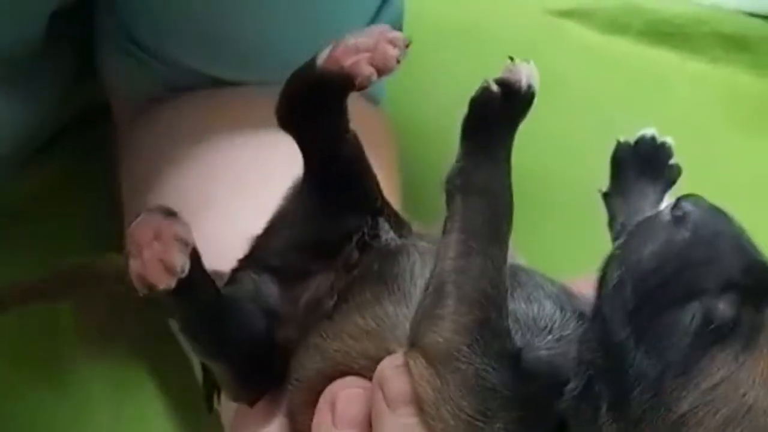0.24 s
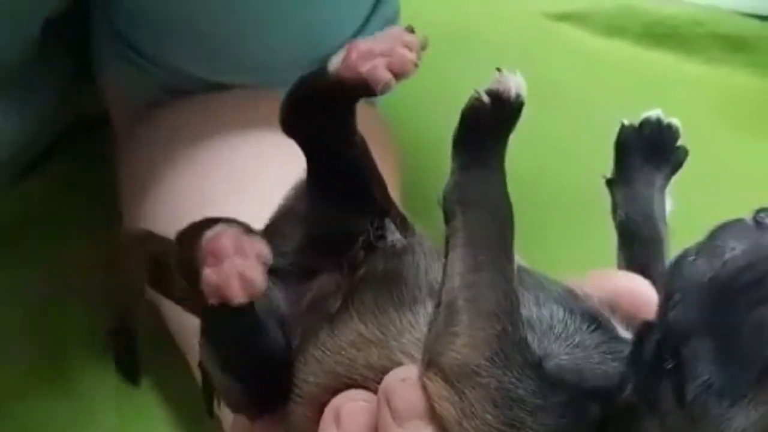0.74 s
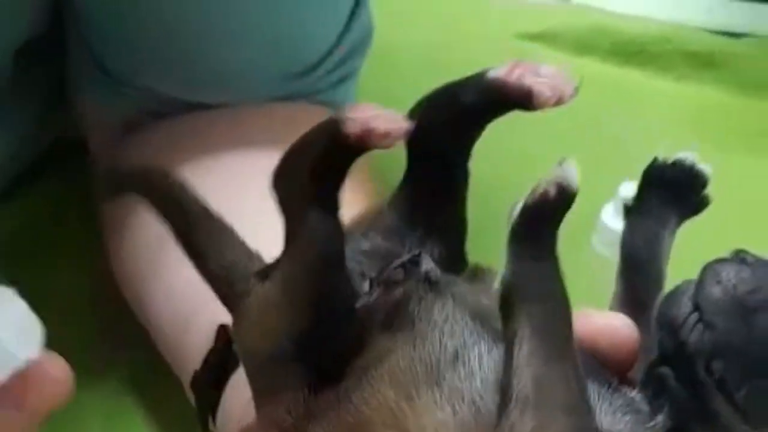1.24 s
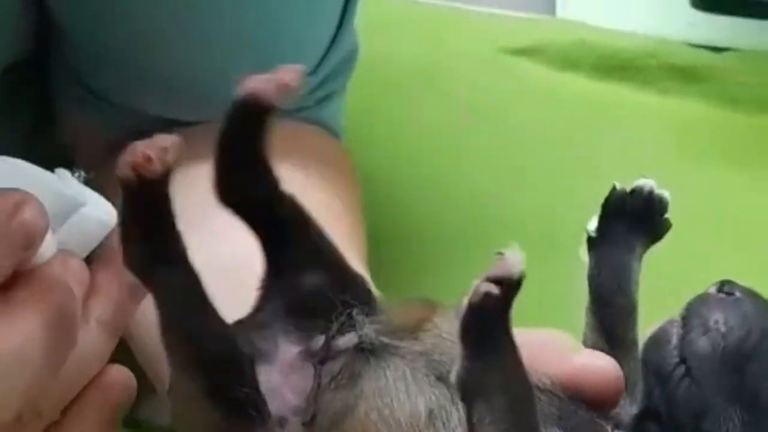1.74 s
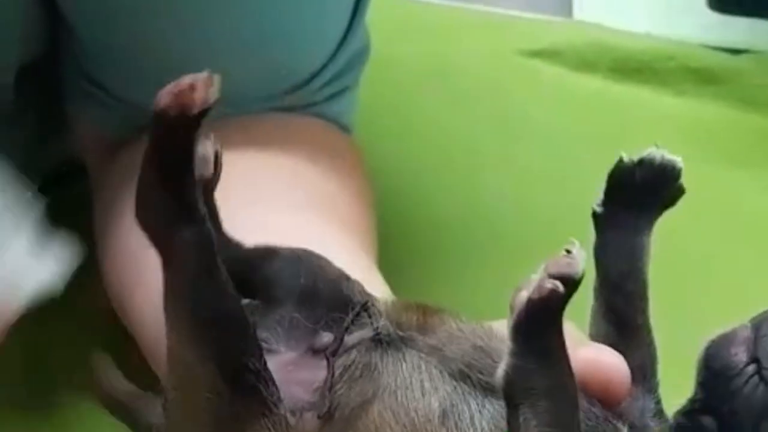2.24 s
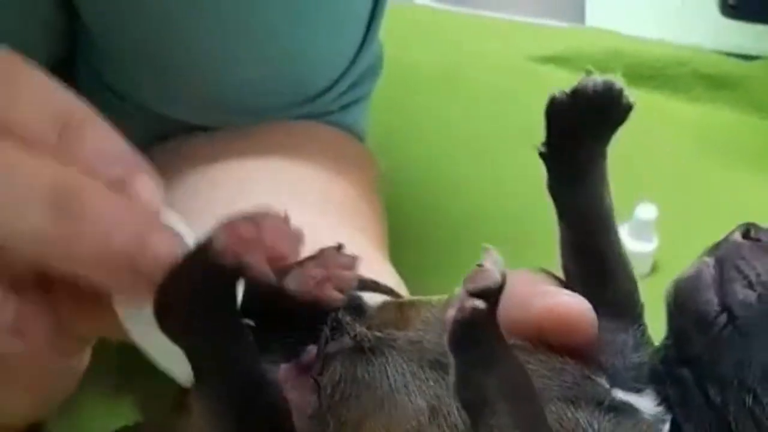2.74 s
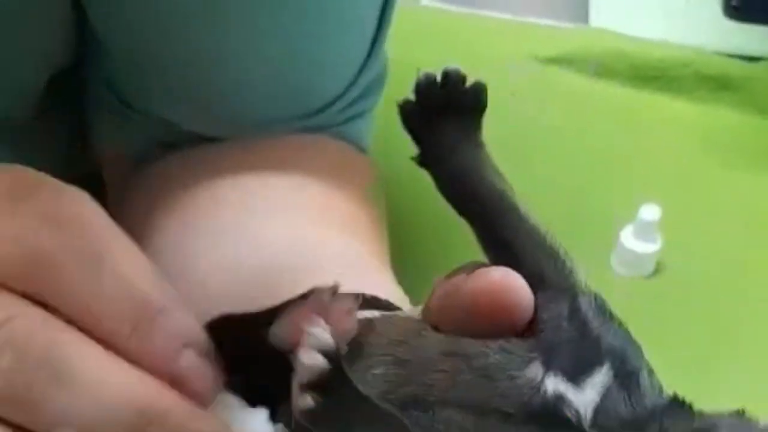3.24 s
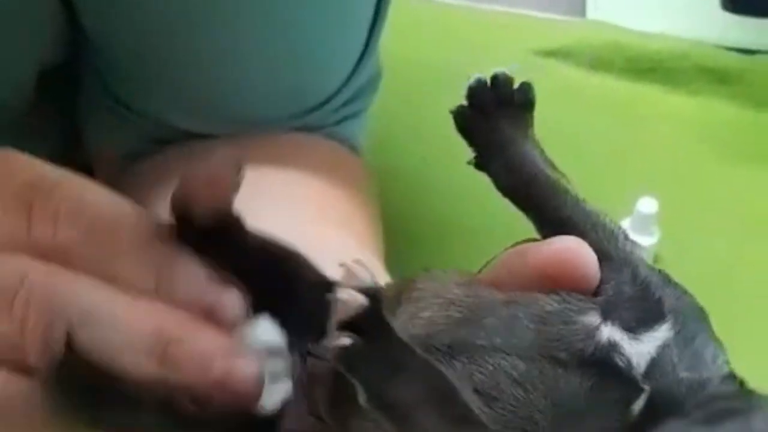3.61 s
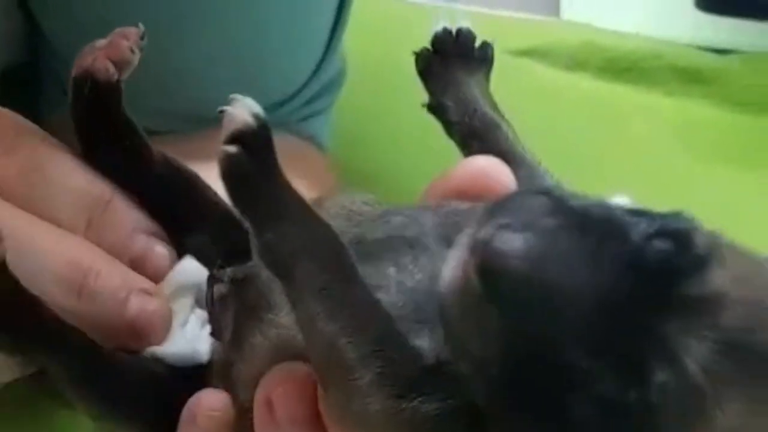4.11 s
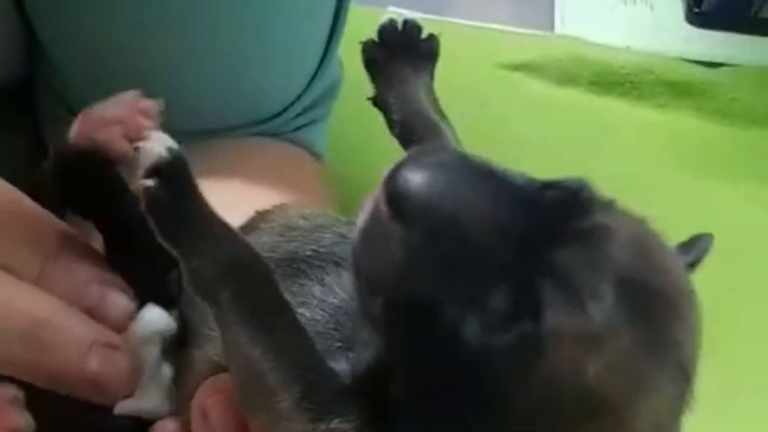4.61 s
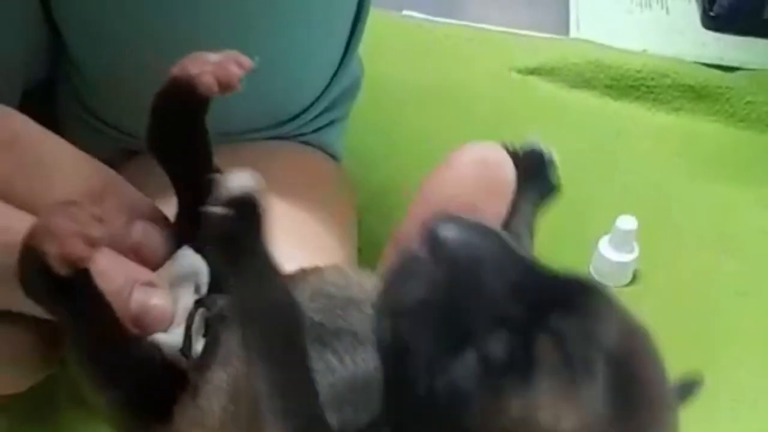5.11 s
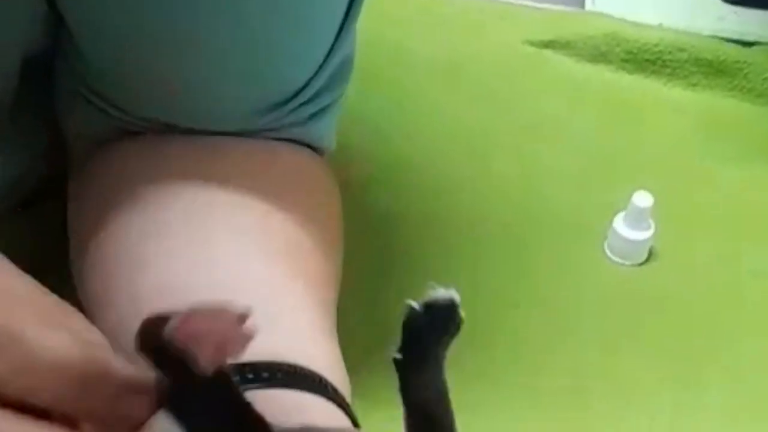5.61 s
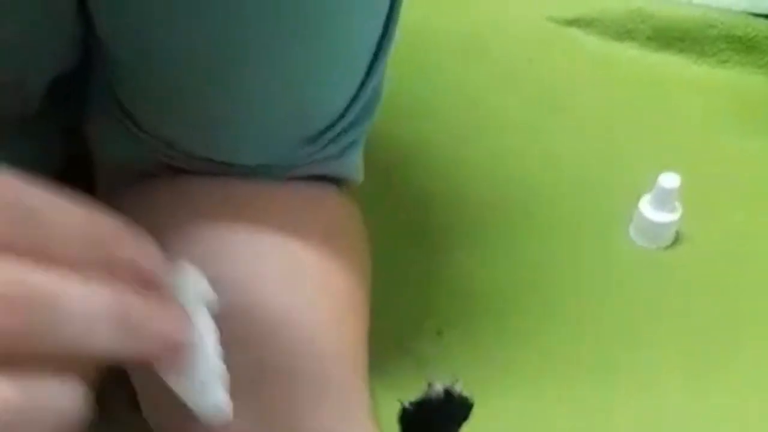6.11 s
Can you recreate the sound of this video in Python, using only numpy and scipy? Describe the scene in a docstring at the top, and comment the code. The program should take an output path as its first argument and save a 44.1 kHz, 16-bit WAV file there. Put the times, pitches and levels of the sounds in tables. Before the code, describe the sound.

Very close in a small furnished room, soft fingers brush fur over a low appliance hum. A newborn puppy lets out one short thin squeal and a faint gasp. A rough rasp then clears into a long, wavering, much louder squeal that snaps off in a yip. After a brief gap comes a lower, open wail fading in hiss, then a faint gasp and a few dull touches.

```python
"""Source-filter synthesis of a newborn puppy crying close to a phone in a small furnished room.
Soft touches on fur come first; then pulses of one larynx ring the throat as a short squeal and a gasp.
A rasp clears into a long squeal ending in a yip; a lower wail trails off in hiss, then a gasp and touches.
Two microphone ports hear it by delay, echo and diffuse decay; an appliance's tones and filtered noise
hum throughout, and the phone turns the bass down when little sounds above it."""
import sys
import numpy as np
from scipy import signal
from scipy.fft import rfft, irfft
from scipy.io import wavfile
from scipy.ndimage import uniform_filter1d

SR = 44100
rng = np.random.default_rng(int(sys.argv[2]) if len(sys.argv) > 2 else 0)


def generate_wav(sig):
    """Save sig (samples, or channels by samples) to the path in sys.argv[1] as 16-bit PCM at SR."""
    pcm = np.round(np.clip(np.atleast_2d(sig).T, -1, 1) * 32767).astype(np.int16)
    wavfile.write(sys.argv[1], SR, pcm)


N = 280476
TIME = np.arange(N) / SR  # s
FREQ = np.maximum(np.arange(N // 2 + 1) * SR / N, 1)  # Hz

# Centre pitch of each cry before jitter: (time [s], pitch [Hz])
SQUEAL_PITCH = [(1.13, 1002), (1.16, 1135), (1.17, 1010), (1.212, 1169), (1.33, 1141), (1.376, 1076),
                (1.398, 840), (1.42, 750)]
RASP_PITCH = [(1.85, 977), (1.878, 1237), (1.884, 818), (1.92, 1018), (1.928, 1147), (2.0, 1277),
              (2.14, 1296), (2.165, 1230)]
LONG_PITCH = [(2.17, 1244), (2.296, 1257), (2.35, 1330), (2.385, 1333), (2.66, 1307), (2.69, 1177),
              (2.75, 1140), (2.764, 1081), (2.888, 1100), (3.0, 1313), (3.08, 1410), (3.236, 1241),
              (3.28, 1322), (3.312, 1294)]
YIP_PITCH = [(3.316, 927), (3.326, 1018), (3.338, 1173), (3.36, 1113)]
WAIL_PITCH = [(3.81, 369.5), (3.822, 377.6), (3.976, 418), (4.088, 568.4), (4.22, 552), (4.29, 586.2),
              (4.374, 441), (4.44, 445.5), (4.458, 481), (4.65, 553.3), (4.68, 390.4), (4.72, 396.4)]
# Effort of each cry, to which each band adds its own offset: (time [s], level [dB])
SQUEAL_EFFORT = [(1.13, -62), (1.15, -57.5), (1.23, -47), (1.35, -49), (1.402, -48.5), (1.425, -67)]
RASP_EFFORT = [(1.853, -65), (1.88, -49.5), (1.96, -52.5), (2.01, -56.5), (2.12, -53), (2.164, -47)]
LONG_EFFORT = [(2.166, -42.0), (2.29, -45.5), (2.4, -54), (2.65, -49.5), (2.7, -43), (2.77, -43.5),
               (2.8, -36.5), (2.93, -34), (3.02, -39), (3.2, -35.5), (3.315, -42.5)]
YIP_EFFORT = [(3.319, -39.5), (3.325, -35), (3.337, -34.5), (3.353, -55.5)]
WAIL_EFFORT = [(3.814, -67), (3.825, -54), (3.99, -46.5), (4.1, -40), (4.31, -41.5), (4.4, -49.5),
               (4.52, -49), (4.6, -40), (4.68, -40), (4.73, -66), (4.8, -79)]
# Throat and mouth resonance, tight for the long squeal, open for the wail: (frequency [Hz], gain [dB])
SQUEAL_THROAT = [(500, -17), (850, 2), (1150, -2), (1700, -4.5), (2300, -6.5), (2800, -1), (3450, -11.5),
                 (4100, -25.5), (5200, -36), (8000, -24), (8700, -34), (10100, -15), (12200, -29),
                 (14600, -20)]
RASP_THROAT = [(450, -9.5), (900, -1.5), (1250, -1), (1600, 0), (2600, 6), (3600, 6.5), (4500, 6.5),
               (5200, -27.5), (7300, -11.5), (8300, -19), (9600, -21), (12900, -8), (14400, -13),
               (15500, -35)]
TIGHT_THROAT = [(500, -9), (900, 2), (1250, 2), (1800, -2.5), (2550, -6.5), (3100, -19.5), (4100, -20),
                (5400, -40.5), (6700, -23.5), (8700, -35), (10400, -15.5), (12000, -22), (14200, -11.5),
                (15600, -17)]
OPEN_THROAT = [(330, -13), (600, -3), (820, 1.5), (1130, -0.5), (1400, -2.5), (1680, -8), (2150, -12.5),
               (2850, -13.5), (3500, -7), (3900, -11), (4300, -16.5), (5200, -21), (7000, -14), (8400, -37),
               (10200, -7), (12300, -35), (14700, -20.5)]
# Raggedness of the vocal folds, added to their settled state:
# (start [s], end [s], ramp [s], roughness [0-1], strong-weak alternation [0-1])
RATTLES = [(1.1, 1.2, .015, .11, .55), (1.375, 1.45, .03, .27, .55), (1.84, 1.925, .02, .11, .65),
           (1.925, 1.98, .02, .27, .6), (1.98, 2.105, .02, .74, .45), (2.105, 2.168, .015, .22, .7),
           (2.392, 2.665, .02, .7, .2), (2.665, 2.78, .02, .08, 0), (2.735, 2.783, .015, .05, .6),
           (3.75, 4.0, .14, .1, .25), (4.42, 4.52, .05, .07, .15), (4.657, 4.82, .02, .33, .1)]
# Throat squeezes: (peak [s], rise [s], fall [s], change of mouth ring and edge [dB], peak hiss level [dB])
SQUEEZES = [(1.19, 0.048, 0.0053, 5.5, -51), (2.07, 0.11, 0.096, 14, -71), (2.762, 0.014, .018, -0.5, -60),
            (2.97, .06, 0.032, 3.5, -57.5), (3.2, 0.08, .12, 4, -55), (4.6, .04, 0.064, -1.5, -34.5),
            (4.69, 0.023, 0.078, -6.5, -48)]
# Spectrum of the squeezed airflow: (frequency [Hz], relative level [dB])
SQUEEZE_HISS = [(4000, -37), (7000, -8), (8500, -24.5), (10200, 8.5), (12000, -9), (14500, 6)]
# Breaths drawn after a cry: (start [s], end [s], mean level [dB])
GASPS = [(1.416, 1.79, -76), (4.774, 5.14, -80.5)]
# Spectrum of the drawn breath in the airway: (frequency [Hz], relative level [dB])
AIRWAY = [(400, -18), (750, -7.5), (1120, -5), (1900, -14.5), (3000, -2.5), (4500, -21.5), (8000, -29.5)]
# Colour of the voice at the ports: (frequency [Hz], left minus right [dB])
PORT_TILT = [(550, 4.5), (900, -0.5), (1150, -8), (1260, -4), (1400, 4), (1550, -0.5), (2100, -4),
             (2500, -7.5), (3400, -6), (7000, 0.5), (11500, 10), (14500, -1.5)]
# Reflections from near surfaces (lap, bed, wall) at each port: (delay [ms], share of direct sound [ratio])
LEFT_ECHOES = [(1.9, .12), (5.3, 0.05)]
RIGHT_ECHOES = [(2.401, 0.12), (6.1, 0.09)]
# Quick scatter of the voice by the puppy's body and the lap: (frequency [Hz], gain [dB])
SCATTER = [(500, -17.5), (1200, -10), (2200, -7.5), (5000, 1.5), (12000, -3.5)]
# Strength of the room's diffuse answer: (frequency [Hz], gain [dB])
ROOM_SEND = [(500, -17), (1200, -22), (2500, -26), (4000, -21), (7000, -16), (12000, -13)]
# Soft handling of fur and cloth:
# (start [s], peak brush level [dB], thud relative to brush [dB], swell time [s])
TOUCHES = [(.17, -83, -8, 0.042), (.555, -101, 38.5, 0.063), (5.416, -77, 0, 0.0012),
           (6.023, -77, 23.5, 0.036), (6.276, -76, -3, 0.037)]
# Tones of the appliance, before the common raise: (frequency [Hz], level [dB])
HUM = [(100.5, -67.5), (139, -69), (194.2, -61)]
# Balance of hum and rumble between the ports: (frequency [Hz], left minus right [dB])
HUM_TILT = [(60, -5), (110, -3), (200, -6.5), (380, -8.5), (700, -3), (1290, -3), (2380, -11), (4400, -13),
            (8120, 7), (15000, -9)]
# Spectrum of the appliance's rumble: (frequency [Hz], relative level [dB])
RUMBLE = [(15, -38.5), (25, -24.5), (48, -12.5), (69, -20), (91, -5.5), (139, -5), (167, -6.5), (197, -2.5),
          (223, -13.5), (295, -15), (384, -26), (412, -30.5), (700, -44), (910, -67.5), (1540, -120)]
# Spectrum of the microphone hiss: (frequency [Hz], relative level [dB])
MIC_HISS = [(350, -33), (600, 0), (625, -3), (984, -6.5), (2180, -16.5), (4980, -17), (7730, -22.5),
            (9760, -12.5), (10700, -15), (14300, -15.5), (16000, -14)]

CLEAR, HUSKY = .026, .045  # roughness of the settled folds, 0-1
ONSET_ROUGH, SETTLE_S = .25, .022  # extra roughness at a cry's start, and its decay time
RING_FOLLOW, EDGE_FOLLOW = 0.92, 0.96  # dB gained by mouth ring and thin edge per dB of effort
EDGE_DB_PER_OCTAVE = 8.5  # rise of the edge with pitch
FLUTTER_DB, UPPER_FLUTTER_DB = 1.3, -0.8
ROOM_T60_S, SCATTER_T60_S = .33, 0.039
HUM_WAVER_DB = 2.3
SUPPRESS_DB, OPEN_DB, KNEE_DB, SUPPRESS_S = 5, -47, 4, 0.083  # bass cut, threshold, softness, window
TOP_HZ = 15850


def larynx(hz, rough, alternation, start, end):
    """Quasi-periodic excitation: one click per fold closure, perturbed in time and size by roughness."""
    jitter = (.001 + .05 * rough) * walk(260)
    drift = .0025 * walk(45)
    rough_drift = .05 * np.minimum(rough, .25) * (walk(90) + walk(30))
    hz = hz * (1 + jitter + drift + rough_drift)
    cycles = np.cumsum(hz * (TIME > start) * (TIME < end)) / SR
    turn = np.arange(1, int(cycles[-1]))
    at = np.interp(turn, cycles, np.arange(N))  # closures, in samples
    i = at.astype(int)
    swing = 1 - 2 * (turn % 2)  # alternates +1 and -1
    time_chance, size_chance = rng.standard_normal((N // 100, 2))[:len(turn)].T
    shift = .19 * rough[i] ** 1.25 * time_chance + .07 * alternation[i] * swing  # periods
    at = at + SR / hz[i] * shift
    size = np.exp(.55 * rough[i] * size_chance) * (1 + .6 * alternation[i] * swing)
    # windowed sinc clicks place each closure between samples
    taps = at.astype(int)[:, None] + np.arange(-8, 9)
    offset = taps - at[:, None]
    clicks = size[:, None] * np.sinc(offset) * np.sinc(offset / 9)
    return np.bincount(taps.ravel(), clicks.ravel(), N), cycles


def folds(start, calm):
    """Irregular vibration: the folds start raggedly, settle, and break into rattles."""
    rough = calm + ONSET_ROUGH * np.exp(-np.abs(TIME - start) / SETTLE_S)
    alternation = 0
    for on, off, ramp_s, roughness, uneven in RATTLES:
        rattle = span(on, off, ramp_s)
        rough = rough + roughness * rattle
        alternation = alternation + uneven * rattle
    return rough, alternation


def cry(pitch, effort, throat, calm, low_db, ring_db, edge_db, brighten_db, pan_db, air):
    """Source-filter principle: pulses and air puffs ring the throat; effort sets the balance of bands."""
    hz, = curves(pitch)
    db, = curves(effort)
    start, end = effort[0][0], effort[-1][0]
    gate = span(start, end, .004)
    rough, alternation = folds(start, calm)
    pulses, cycles = larynx(hz, rough, alternation, start - .02, end + .02)
    puffs = band(rng.standard_normal(N), 12000, 17600) * np.cos(np.pi * cycles) ** 2
    voice = colour(pulses + air * puffs * gate, throat)

    usual_db, usual_hz = np.average(db, weights=gate), np.average(hz, weights=gate)
    push = db - usual_db
    progress = np.clip((TIME - start) / (end - start), 0, 1) - .5
    squeeze = sum(shrill_db * hump(s, rise, fall) for s, rise, fall, shrill_db, _ in SQUEEZES)
    ring = ring_db + RING_FOLLOW * push + squeeze
    edge = edge_db + EDGE_FOLLOW * push + squeeze
    edge = edge + EDGE_DB_PER_OCTAVE * np.log2(hz / usual_hz)
    edge = edge + brighten_db * progress  # drift over the whole cry

    # the level of the cry flutters, a little more in its upper partials
    flutter, upper_flutter = FLUTTER_DB * walk(55), UPPER_FLUTTER_DB * walk(35)
    body = steady(band(voice, 170, 2200, order=12)) * undb(low_db + push)
    mouth = steady(band(voice, 1745, 4030, order=12)) * undb(ring + upper_flutter)
    thin = steady(band(voice, 5000, 17000, order=16)) * undb(edge + upper_flutter)
    upper = (mouth + thin) * sides(pan_db)[:, None]
    return (body + upper) * gate * undb(usual_db + flutter)


def throat_hiss():
    """Turbulence noise: air is forced through the squeezed throat."""
    flow = sum(undb(db) * hump(s, rise, fall) for s, rise, fall, _, db in SQUEEZES)
    return flow * level(colour(rng.standard_normal(N), SQUEEZE_HISS), 0)


def gasps(ramp_s=0.051):
    """Turbulence noise filtered by the airway: the puppy's faint intake of air."""
    flow = sum(undb(db) * span(start, end, ramp_s) for start, end, db in GASPS)
    return flow * level(colour(rng.standard_normal(N), AIRWAY), 0) * undb(0.5 * walk(23))


def ports(voice, lag_ms):
    """Arrival-time difference and comb filtering: the left port hears first; echoes ripple both."""
    left = 1 + sum(share * delay(ms) for ms, share in LEFT_ECHOES)
    right = 1 + sum(share * delay(ms) for ms, share in RIGHT_ECHOES)
    tilt = np.sqrt(gains(PORT_TILT))  # half the difference on each side
    return irfft(rfft(voice) * np.array([left * tilt, right * delay(lag_ms) / tilt]), N)


def room(voice, build_s=0.028):
    """Diffuse-field decay: quick scatter from close by, then the room's short tail."""
    scatter = gains(SCATTER) * tail(SCATTER_T60_S, build_s / 10)
    reverberation = gains(ROOM_SEND) * tail(ROOM_T60_S, build_s)
    return irfft(rfft(voice.mean(axis=0)) * (scatter + reverberation), N)


def tail(t60_s, build_s):
    """Exponential decay of dense reflections: a spectrum of unit energy, independent at each port."""
    echoes = rng.standard_normal((2, N)) * undb(-60 * TIME / t60_s) * (1 - np.exp(-TIME / build_s))
    return rfft(echoes / np.sqrt(np.sum(echoes ** 2, axis=1, keepdims=True)))


def handling():
    """Friction noise and low impact noise: fingers and cloth brush the fur, with dull thuds."""
    brush = level(band(rng.standard_normal((2, N)), 590, 8000, order=2), 0) * undb(1.1 * walk(60))
    thud = level(band(rng.standard_normal(N), 110, 160, order=3), 0)
    out = 0
    for s, db, thud_db, swell_s in TOUCHES:
        age = np.maximum(TIME - s, 0)
        swell = age / swell_s * np.exp(1 - age / swell_s)  # peaks at 1
        out = out + undb(db) * swell * (brush + undb(thud_db) * thud)
    return out


def appliance(hum_db=4, rumble_db=-55.5, apart=0.42, swell_db=2.0):
    """Tonal hum and partly correlated noise: wavering lines and rumble, mostly louder on the right."""
    hum = 0
    for hz, db in HUM:
        strength = np.sqrt(2) * undb(db + hum_db + HUM_WAVER_DB * walk(8))
        hum = hum + strength * np.sin(2 * np.pi * hz * TIME + 0.163 * walk(4))
    noise = rng.standard_normal(N) + apart * rng.standard_normal((2, N))  # shared plus separate
    rumble = level(colour(noise, RUMBLE), rumble_db)
    low = irfft(rfft(hum + rumble) * sides(gains_db(HUM_TILT)), N)
    return low * undb(swell_db * walk(4.9))


def microphone_hiss():
    """Stationary self-noise: smooth coloured hiss, independent at each port."""
    return level(colour(rng.standard_normal((2, N)), MIC_HISS), -78)


def undb(db):
    """Logarithmic level: decibels to amplitude gain."""
    return 10 ** (np.asarray(db) / 20)


def level(x, db):
    """Root-mean-square measure: scale the signal to an rms level."""
    return x * undb(db) / np.sqrt(np.mean(x ** 2))


def curves(table):
    """Linear interpolation: each column of a table, joined by straight lines in time."""
    s, *columns = np.transpose(table)
    return [np.interp(TIME, s, c) for c in columns]


def gains_db(points):
    """Logarithmic frequency scale: level in dB at every frequency, from points."""
    hz, db = np.transpose(points)
    return np.interp(np.log(FREQ), np.log(hz), db)


def gains(points):
    """Spectral envelope: amplitude gain at every frequency, from points."""
    return undb(gains_db(points))


def colour(x, points):
    """Minimum-phase filtering: a causal response of the given spectrum rings after each pulse."""
    cepstrum = irfft(np.log(gains(points)), N)
    cepstrum[1:N // 2] *= 2  # folding the cepstrum makes the response causal
    cepstrum[N // 2 + 1:] = 0
    return irfft(rfft(x) * np.exp(rfft(cepstrum)), N)


def band(x, lo_hz, hi_hz, order=8):
    """Zero-phase filtering: a band-pass without delay."""
    response = 1 / (1 + (lo_hz / FREQ) ** order) / (1 + (FREQ / hi_hz) ** order)
    return irfft(rfft(x) * response, N)


def delay(ms):
    """Linear phase: the frequency response of a pure delay."""
    return np.exp(-2j * np.pi * FREQ * ms / 1000)


def walk(rate):
    """Slow random fluctuation: levels held 1 / rate s, smoothed twice, with unit deviation."""
    k = int(SR / rate)
    held = np.repeat(rng.standard_normal(N // k + 1), k)
    y = uniform_filter1d(uniform_filter1d(held, k), k)[:N]
    return y / y.std()


def steady(x, size=700):
    """Envelope normalisation: hold the running rms near 1 where there is signal."""
    power = uniform_filter1d(uniform_filter1d(x ** 2, size), size)
    return x / np.sqrt(np.abs(power) + np.max(power) / 10 ** 6)


def sides(pan_db):
    """Constant-power panning: left and right gain for a left-minus-right level."""
    pair = undb(np.array([pan_db, -pan_db]) / 2)
    return pair / np.sqrt(np.mean(pair ** 2, axis=0))


def hump(peak_s, rise_s, fall_s):
    """Generalised Gaussian envelope: a smooth, flat-topped rise to 1 and fall."""
    width = np.where(TIME < peak_s, rise_s, fall_s)
    return np.exp(-np.abs((TIME - peak_s) / width) ** 2.6)


def span(start, end, ramp_s):
    """Trapezoidal envelope: straight ramps centred on the start and end times."""
    return np.clip(np.minimum(TIME - start, end - TIME) / ramp_s + .5, 0, 1)


def scene():
    """Superposition: direct cries and breath, the room's answer, handling and background add."""
    squeal = cry(SQUEAL_PITCH, SQUEAL_EFFORT, SQUEAL_THROAT, HUSKY, low_db=1.5, ring_db=-4,
                 edge_db=-17.5, brighten_db=1, pan_db=-2, air=0.034)
    rasp = cry(RASP_PITCH, RASP_EFFORT, RASP_THROAT, HUSKY, low_db=3, ring_db=-14.5,
               edge_db=-15.5, brighten_db=6.5, pan_db=-1, air=0.1)
    long_squeal = cry(LONG_PITCH, LONG_EFFORT, TIGHT_THROAT, CLEAR, low_db=-1.5, ring_db=-13.0,
                      edge_db=-22.0, brighten_db=8.5, pan_db=-1.5, air=.03)
    yip = cry(YIP_PITCH, YIP_EFFORT, TIGHT_THROAT, HUSKY, low_db=-2.5, ring_db=-28,
              edge_db=-28, brighten_db=-19.5, pan_db=9, air=.05)
    wail = cry(WAIL_PITCH, WAIL_EFFORT, OPEN_THROAT, HUSKY, low_db=1, ring_db=-2.5,
               edge_db=-12, brighten_db=-10, pan_db=5.5, air=0.54)
    squeals = squeal + rasp + long_squeal + yip
    # the wail and throat hiss reach the right port slightly later than the squeals do
    near = ports(squeals + gasps(), lag_ms=0.2086) + ports(wail + throat_hiss(), lag_ms=0.241)
    return near + room(squeals + wail) + handling() + appliance() + microphone_hiss()


def record(dry):
    """Level-dependent filtering: the phone cuts bass when little sounds above it, and cuts the top."""
    bass = band(dry, 1, 400, order=4)
    power = uniform_filter1d(np.mean((dry - bass) ** 2, axis=0), size=int(SUPPRESS_S * SR))
    power_db = 10 * np.log10(np.abs(power))
    quiet = .5 - .5 * np.tanh((power_db - OPEN_DB) / KNEE_DB)  # 1 in silence, 0 when loud
    out = dry + bass * (undb(-SUPPRESS_DB * quiet) - 1)
    return signal.sosfilt(signal.ellip(10, .2, 70, TOP_HZ, fs=SR, output="sos"), out)


dry = scene()
out = record(dry)
generate_wav(out)
```